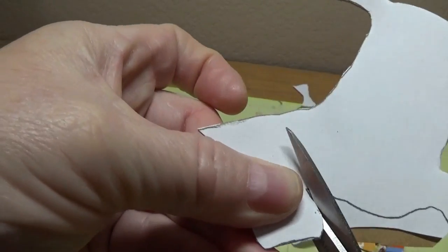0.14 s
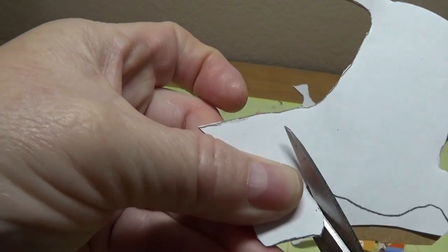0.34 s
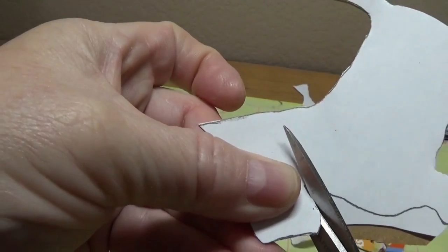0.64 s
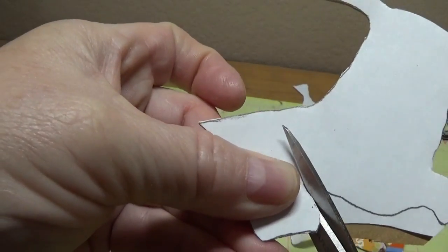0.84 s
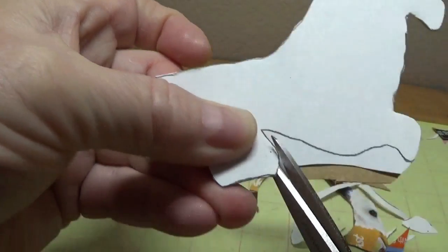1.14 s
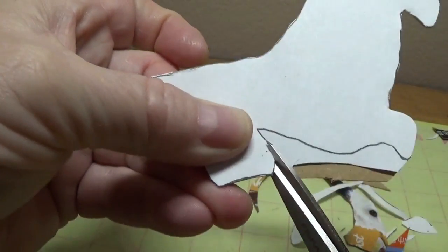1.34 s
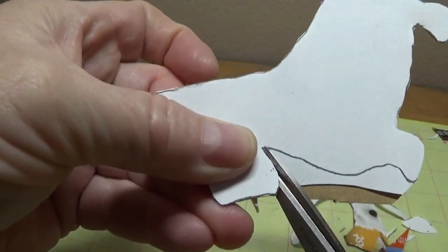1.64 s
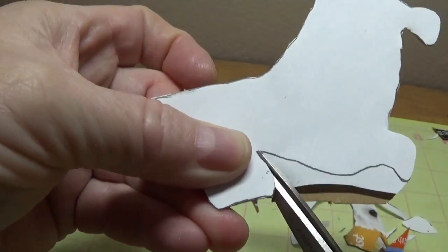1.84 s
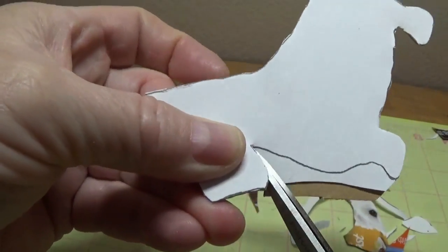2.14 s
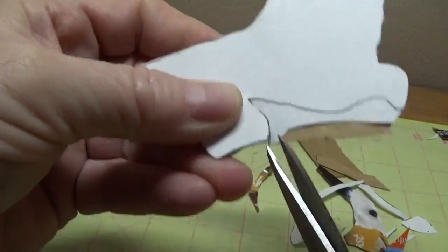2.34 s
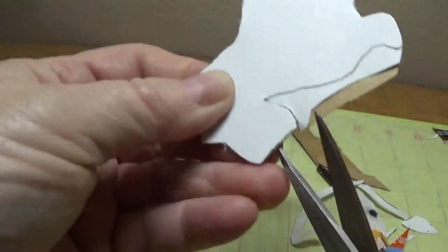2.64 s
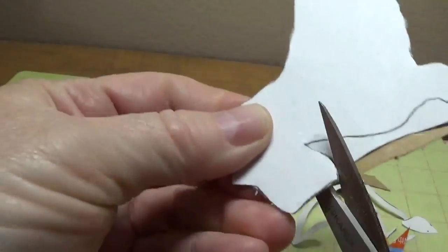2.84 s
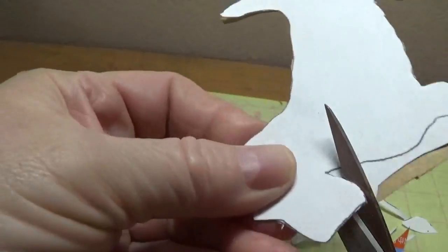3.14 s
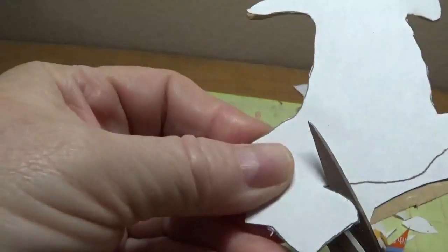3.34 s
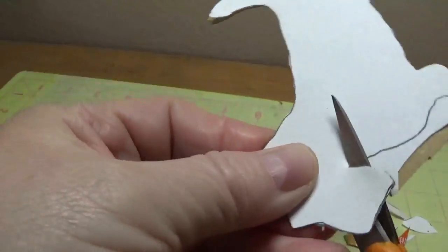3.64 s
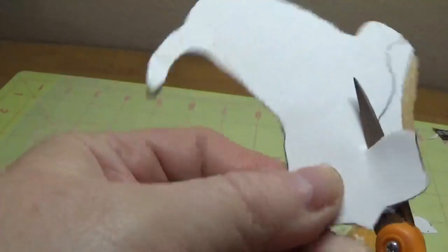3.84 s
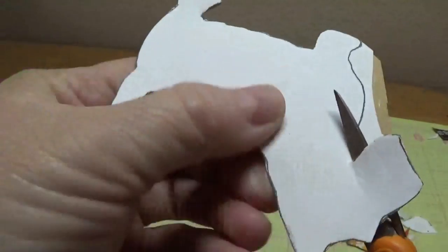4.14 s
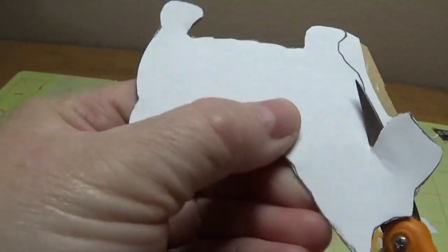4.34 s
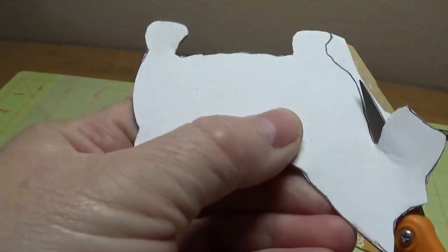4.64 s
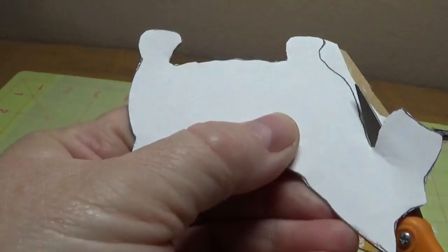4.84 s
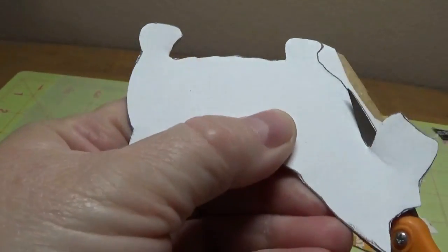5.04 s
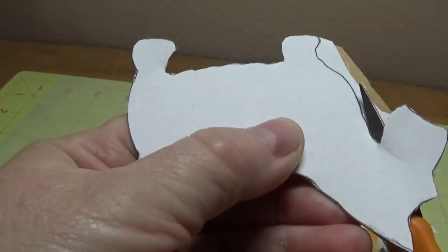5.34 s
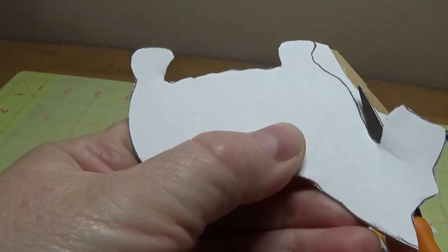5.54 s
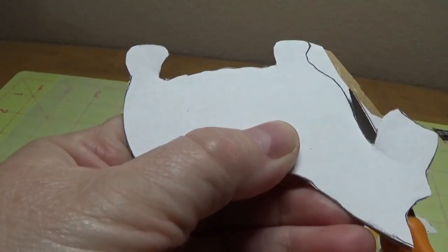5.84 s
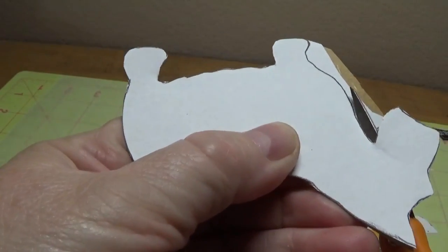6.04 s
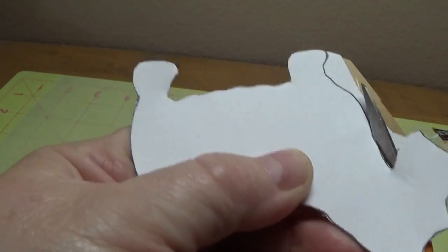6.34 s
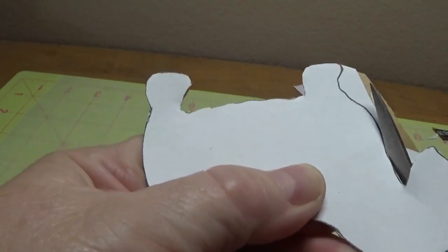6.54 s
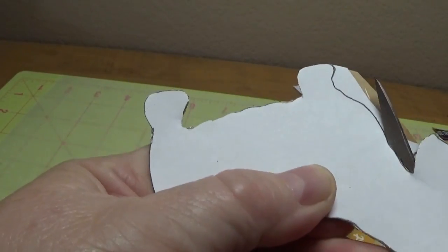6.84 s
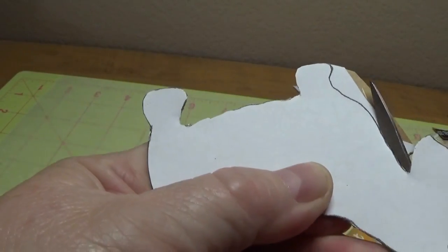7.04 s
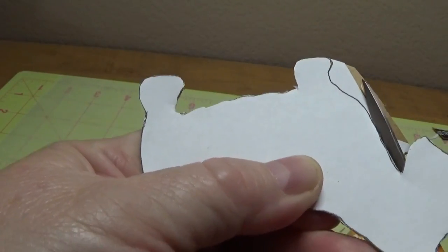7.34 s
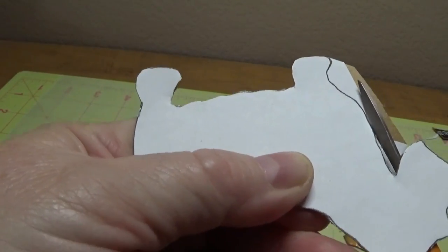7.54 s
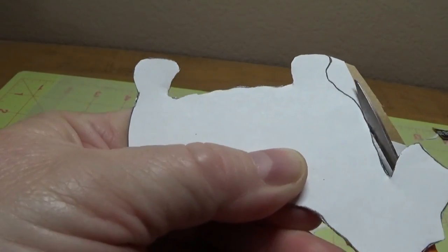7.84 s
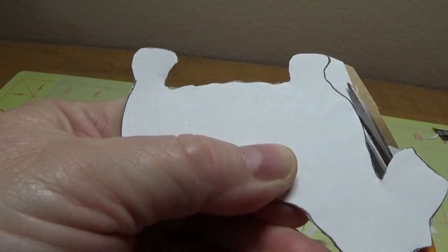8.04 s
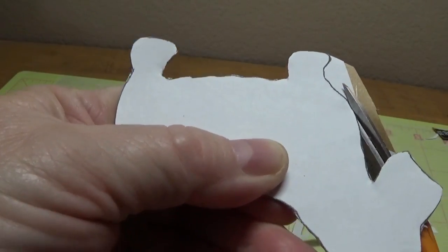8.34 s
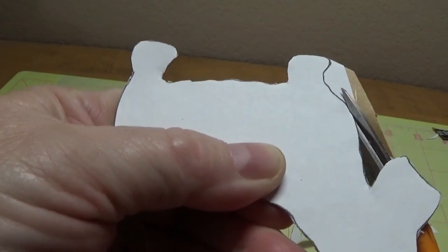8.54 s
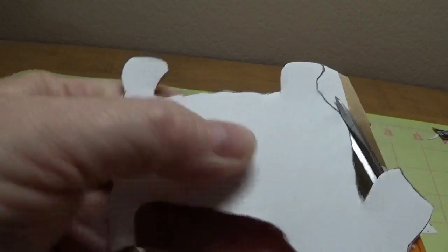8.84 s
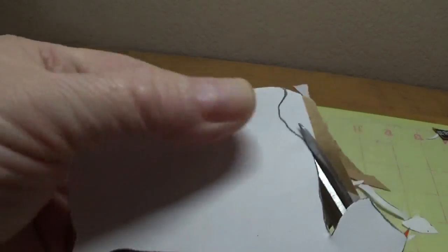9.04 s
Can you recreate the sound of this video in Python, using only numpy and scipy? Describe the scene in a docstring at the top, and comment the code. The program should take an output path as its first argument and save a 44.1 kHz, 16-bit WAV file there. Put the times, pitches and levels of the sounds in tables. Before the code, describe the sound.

Scissors snip irregularly through paper-covered cardboard close by, with dry rubbing, fine crackles and hollow snaps over a low steady hum.

```python
"""A craft table in a small room: scissors cut a shape out of paper-covered cardboard, heard from close by.
Blades and fingers rub on the sheet (grainy filtered noise) and fibres tick (tiny noise bursts).
Each snip ends in a snap: a brief tear that thuds and rings the card in a few fading tones.
An appliance hums (steady tones, resonant noise and air) and a camera whirrs faintly (rapid small ticks)."""
import sys
import numpy as np
from scipy import signal
from scipy.fft import rfft, irfft, next_fast_len
from scipy.io import wavfile
from scipy.ndimage import map_coordinates

SR = 44100
rng = np.random.default_rng(int(sys.argv[2]) if len(sys.argv) > 2 else 0)


def put_to_file(sound):
    """Save the sound as 16-bit audio at rate SR, in the file named by the first command-line argument."""
    columns = np.atleast_2d(sound).T  # one column per channel
    safe = np.clip(columns, -1, 1)
    whole_steps = np.round(safe * 32767)
    wavfile.write(sys.argv[1], SR, whole_steps.astype(np.int16))


N = 405719

# Levels of the card's sounds are those before the microphones and the room.
# The card gives way: t/s, tear length/s, thud level/dB, low ring f/Hz, level/dB, high ring f/Hz, level/dB,
# crack level/dB, fizz level/dB, raggedness/0-1; the thud is lowered further, levels are rms over 10 ms
SNAPS = [(0.642, 0.0054, -45, 990, -39.5, 2090, -42, -32, -37.5, 0.1),
         (2.021, 0.0021, -36, 800, -33.5, 1940, -43, -30, -26, 0.08),
         (2.873, 0.0011, -47, 660, -41.5, 1170, -47, -46, -54, 0.26),
         (2.9028, 0.0011, -50, 734, -38.5, 1380, -40.5, -45.5, -42.5, 0.23),
         (3.52, 0.00062, -54, 700, -43, 1190, -55, -43.5, -49.5, 0.26),
         (4.94, 0.0046, -35.5, 988, -21, 1860, -24.5, -28, -28.5, 0.62),
         (5.7702, 0.0028, -36.5, 940, -24, 2370, -29.5, -30.5, -29.5, 0.53),
         (6.0527, 0.0054, -39.5, 1170, -24, 1590, -51, -32, -30.5, 0.28),
         (6.9363, 0.0051, -53, 1160, -43, 1520, -51, -39, -40.5, 0.7),
         (6.9918, 0.0041, -32.5, 780, -32.5, 1380, -29, -27.5, -31, 0.17),
         (7.2046, 0.0045, -41.5, 846, -37, 1540, -31, -31, -32.5, 0.6),
         (7.2353, 0.0025, -43.5, 1170, -31.5, 1480, -27, -30.5, -30.5, 0.99),
         (7.6537, 0.0013, -48.5, 890, -50, 1375, -49, -37, -39.5, 0.6),
         (7.859, 0.0036, -38, 990, -27.5, 1540, -21.5, -29, -30.0, 0.04),
         (8.141, 0.0018, -46, 1180, -38.5, 2160, -46, -33, -31, 0.43),
         (8.823, 0.0058, -45.5, 910, -58, 2240, -39, -40.5, -30.5, 0.02)]
# Blades or fingers slide over the card: t/s when fastest, rise/s, fall/s,
# sheet level/dB, rasp level/dB, fizz level/dB
STROKES = [(0.01, 0.068, 0.1, -56, -54, -52), (0.943, 0.0051, 0.069, -56, -52, -47),
           (0.995, 0.065, 0.15, -48.5, -41, -40.5), (1.095, 0.072, 0.14, -52.5, -50, -61),
           (1.38, 0.04, 0.055, -57.5, -56.5, -61.5), (1.51, 0.06, 0.1, -64, -58, -59.5),
           (1.835, 0.05, 0.036, -60, -56.5, -52.5), (2.025, 0.007, 0.089, -39.5, -40.5, -36.5),
           (2.252, 0.049, 0.15, -51, -48.5, -49.5), (2.47, 0.22, 0.066, -79, -56.5, -45),
           (2.707, 0.053, 0.052, -54, -54, -49.5), (2.819, 0.034, 0.2, -57, -55.5, -52),
           (3.12, 0.12, 0.19, -54, -49, -48.5), (3.248, 0.016, 0.04, -49, -48, -49.5),
           (3.375, 0.074, 0.068, -55, -46, -44), (3.804, 0.071, 0.13, -54, -50, -40.5),
           (3.97, 0.062, 0.2, -52, -47, -46), (4.08, 0.032, 0.095, -53.5, -63, -48.5),
           (4.27, 0.044, 0.28, -57.5, -57, -53), (5.125, 0.06, 0.07, -52, -54.5, -49),
           (5.205, 0.023, 0.039, -55.5, -60, -48.5), (6.21, 0.048, 0.1, -56, -51.5, -48.5),
           (6.338, 0.093, 0.059, -42.5, -40.5, -39.5), (6.46, 0.12, 0.11, -54, -55.5, -53.5),
           (6.609, 0.032, 0.053, -67, -55, -49), (6.695, 0.1, 0.073, -40, -44, -46.5),
           (6.80, 0.022, 0.12, -54.5, -53, -49.5), (7.877, 0.024, 0.05, -45, -42, -43),
           (8.005, 0.021, 0.057, -56, -49, -52.5), (8.427, 0.022, 0.017, -55, -54, -49.5),
           (8.787, 0.041, 0.059, -56, -46, -41.5), (8.82, 0.012, 0.022, -48, -37, -33),
           (9.097, 0.019, 0.028, -48, -46.5, -44)]
# Blades creep through the card: start t/s, length/s, crackle level/dB, treble tilt/dB, brittleness/0-1
CUTS = [(3.528, 0.38, -61, 5.5, 0.6), (4.169, 0.4, -62.5, 4.5, .9), (4.564, .36, -67, 4, 0.85),
        (5.195, 1, -66.5, 4, 0.48), (7.382, 0.19, -61, 5, 0.14), (7.657, 0.14, -61.5, 4, 0),
        (8.09, 0.075, -58.5, 3, 0.06), (8.257, 0.21, -65, 5, 0.47), (8.54, 0.18, -66.5, 7, 0)]
# Single fibres break or catch: t/s, level/dB (rms over 10 ms), treble tilt/dB
TICKS = [(1.2085, -59, 2.5), (1.6685, -51, 7), (1.7747, -58.5, -4), (2.193, -58, 4), (2.3063, -45.5, 6),
         (2.314, -47.5, -2.5), (2.6451, -52.5, -3), (3.625, -60, 11.5), (3.769, -68.5, 26.5),
         (3.7917, -63, 19), (3.8998, -59, 8.5), (3.93, -51.5, 6), (4.107, -51.5, -3.5), (4.1193, -45.5, 1),
         (4.173, -62, 9), (4.2038, -68, 20), (4.22, -61, 13), (4.241, -61, 11), (4.25, -56.5, 18.5),
         (4.257, -60, 21.5), (4.298, -65, 20.5), (4.375, -70.5, 21), (4.4394, -64.5, 16), (4.523, -61, 17),
         (4.54, -62, 11), (4.612, -57.5, 16), (4.682, -71, 21), (4.69, -63, 21.5), (4.755, -62, 16),
         (4.8402, -65, 19), (4.9, -67, 18.5), (6.2813, -55.5, 16.5), (6.603, -52.5, 15), (6.614, -54.5, 15),
         (6.718, -49, 6), (6.8, -50, 1), (7.466, -63, 6), (7.77, -63, 4), (7.997, -47, 1),
         (8.019, -51.5, 5), (8.103, -54, 7), (8.335, -61, 3), (8.593, -55.5, 3.5), (8.65, -58.5, 10.5),
         (8.668, -59.5, 7), (8.7613, -61, 11.5), (8.768, -53.5, -3.5), (8.816, -40, 10), (8.828, -57, 5),
         (9.0785, -56.5, 9), (9.092, -52.5, 9.5)]
# The sheet springs back or a finger shifts its hold: t/s, f/Hz, level/dB (rms over 10 ms)
NUDGES = [(2.028, 555, -38), (2.515, 950, -48.5), (5.38, 1080, -52), (5.495, 1080, -50)]
# Tone of the flexing sheet: f/Hz, level/dB
SHEET_VOICE = [(250, -56), (560, -5.5), (790, 1.5), (2150, 0.5), (2700, -13.5), (5000, -38)]
# Tone of the rasping card: f/Hz, level/dB
RASP_VOICE = [(1200, -41), (2000, -19), (2600, 1), (3400, 3), (4300, -1), (5400, -0.5), (7000, -4.5),
              (9500, -45.5)]
# Tone of the finest fibres: f/Hz, level/dB
FIZZ_VOICE = [(3500, -14.5), (5800, -6), (6900, -2.5), (8000, 4.5), (9600, 5), (10700, 0.5), (12000, -26)]
# Resonance of the held sheet under rubbing, moving as the grip changes: t/s, f/Hz
GRIP_PATH = [(2.1, 4240), (2.7, 3470), (4.1, 3270), (6.33, 2930), (6.66, 1850), (8.0, 4530), (8.75, 2700)]
# Ringing of the steel blades: f/Hz, starting level/dB, time to fade by 60 dB/s
STEEL_MODES = [(992, -51.5, 0.66), (1560, -56, 0.87)]
# Balance of the card's sound: f/Hz, left minus right level/dB
CARD_BALANCE = [(300, 1), (1000, -0.7), (4800, -3), (7800, -2), (11000, -1)]
# How alike left and right hear the card: f/Hz, likeness/0-1
CARD_LIKENESS = [(1500, 1), (5000, 0.79), (11000, 0.94)]
# Echoes from table and walls: delay t/s, level/dB
ECHO_PATHS = [(0.0098, -9), (0.026, -17)]
# Fading of the room: f/Hz, time to fade by 60 dB/s
ROOM_FADE = [(200, 0.37), (1000, 0.24), (3000, 0.16), (10000, 0.15)]
# Tones of the appliance: f/Hz, level/dB (rms)
HUM_TONES = [(59, -64), (122.2, -60.5), (124.3, -67.5), (126.3, -63)]
# Room resonances that the appliance stirs: f/Hz, width/Hz, level/dB (rms, before it wavers)
DRONE_MODES = [(123.5, 14.5, -60.5), (226, 20, -62), (312.6, 9.6, -62), (404.7, 26, -67)]
# Tone of room air and microphone hiss: f/Hz, relative level/dB per Hz
AIR_TONE = [(20, -14), (40, -4), (55, -0.5), (75, -5.5), (110, 2), (180, -0.5), (480, -2.5), (700, -11),
            (1000, -11), (5000, -21.5), (11000, -25.5)]
# How alike left and right hear the air and the room: f/Hz, likeness/0-1
AIR_LIKENESS = [(140, 0.98), (480, 0.85), (1350, 0.073), (3820, 0.33), (10800, 0.83)]
# Resonances of the camera housing: f/Hz, relative level/dB
HOUSING_MODES = [(2850, -2), (3420, -8.5)]

VOICES = (SHEET_VOICE, RASP_VOICE, FIZZ_VOICE)
OVERTONE_RATIO, OVERTONE_DB = 1.323, -6  # a third mode, relative to the high ring
FLEX_WIDTH_HZ = 1300  # bandwidth of the noisy flexing
FLEX_ROUGH = 1.77  # phase roughness of the sheet's modes in a wholly ragged snap
FIRST_BREAK_DB, LAST_BREAK_AT = 0.5, 0.55  # top ply parts first, bottom one at this share of the tear length
FLEX_BREAK_SHARE, CRACK_BREAK_SHARE = 0.43, 0.29  # power share of those two breaks, 0-1
RISE_CURVE, FALL_CURVE = 1.55, 1.07  # fade shape of a stroke: 1 = straight in dB, 2 = rounded
BITE_S = 0.022  # time for the blades to take hold and to let go
STROKE_GRAIN, CUT_GRAIN = 0.39, 0.91  # share of the friction that is crackle, 0-1
CUT_SHEET_DB = 3  # extra flexing of the sheet during a slow cut
GRIP_DB, GRIP_OCTAVES = 3.5, 0.59  # height and half-width of the grip resonance
RINGING_SNIP_S = 7.86
TOP_HZ = 11200


def amp(db):
    """Turn decibels into gain."""
    return 10 ** (np.asarray(db) / 20)


def unit(x):
    """Scale to rms 1."""
    return x / np.sqrt(np.mean(x ** 2) + 1e-20)


def burst(x, db):
    """Scale a short sound so that its energy equals db rms over 10 ms."""
    return amp(db) * x / np.linalg.norm(x) * np.sqrt(SR / 100)


def add(track, s, x):
    """Mix x into the track at time s."""
    start = round(s * SR)
    track[start:start + len(x)] += x[:N - start]


def along(points, hz):
    """Read (Hz, value) points on a logarithmic pitch axis."""
    f, value = np.transpose(points)
    return np.interp(np.log(hz + 1), np.log(f + 1), value)


def wobble(rate):
    """Draw a smooth random curve with rate knots a second."""
    knots = rng.standard_normal(int(N * rate / SR) + 4)
    return map_coordinates(knots, [np.arange(N) * rate / SR])


def filtered(x, response):
    """Multiply the spectrum of x by a response of frequency."""
    n = x.shape[-1]
    size = 2 * next_fast_len(n // 2 + 2048, real=True)
    spectrum = rfft(x, size) * response(np.fft.rfftfreq(size, 1 / SR))
    return irfft(spectrum, size)[..., :n]


def coloured(x, tone):
    """Give x the tone of (Hz, dB) points, with no sound before its cause."""
    def response(hz):
        # folding the cepstrum forward in time makes the filter causal
        cepstrum = irfft(np.log(amp(along(tone, hz))))
        half = len(cepstrum) // 2
        cepstrum[1:half] *= 2
        cepstrum[half + 1:] = 0
        return np.exp(rfft(cepstrum))
    return filtered(x, response)


def resonance(f, hz, width):
    """Frequency response of one damped mode at hz."""
    return 1j * f * width / (hz * hz - f * f + 1j * f * width)


def ring(t, hz, t60, attack, rough):
    """A damped mode swells while it is fed, then fades; roughness unsettles its phase."""
    u = np.maximum(t, 0)
    drift = rough * np.cumsum(rng.standard_normal(len(t))) / np.sqrt(SR * t60)
    swell = 1 - np.exp(-u / attack)
    return np.sin(2 * np.pi * hz * u + drift) * amp(-60 * u / t60) * swell


def spread(a, b, likeness):
    """Blend two unrelated signals into a stereo pair of given likeness."""
    def turn(hz):
        return np.arccos(np.clip(along(likeness, hz), -1, 1)) / 2
    mid = filtered(a, lambda hz: np.cos(turn(hz)))
    side = filtered(b, lambda hz: np.sin(turn(hz)))
    return np.array([mid + side, mid - side])


def snaps():
    """Each snap tears, thuds in the hand and rings the sheet: cleanly in separate modes, raggedly as noise."""
    out = np.zeros(N)
    t = np.arange(-SR // 100, SR // 10) / SR
    for s, length, thud_db, low_hz, low_db, high_hz, high_db, crack_db, fizz_db, ragged in SNAPS:
        def fibres(break_share):
            rush = unit(tear(t, length, lead_db=-9, lead_s=length / 2, after_db=-16, after_s=0.007))
            breaks = unit(plies(t, length))
            return np.sqrt(break_share) * breaks + np.sqrt(1 - break_share) * rush

        def mode(hz, swell, db):
            return burst(ring(t, hz, t60=0.016, attack=length * swell, rough=FLEX_ROUGH * ragged), db)

        thud = burst(ring(t, hz=413, t60=0.018, attack=0.0015, rough=2.0), thud_db - 1.5)
        hand = burst(ring(t, hz=172.0, t60=0.044, attack=0.0022, rough=3.05), thud_db - 4.5)
        # neighbouring modes swing in opposite directions
        modes = mode(low_hz, 0.29, low_db) - mode(high_hz, 0.63, high_db)
        modes += mode(high_hz * OVERTONE_RATIO, 0.13, high_db + OVERTONE_DB)
        # ragged flexing gathers around the stronger mode
        ring_powers = amp([low_db, high_db]) ** 2
        centre_hz = np.average([low_hz, high_hz], weights=ring_powers)
        flex = filtered(coloured(fibres(FLEX_BREAK_SHARE), SHEET_VOICE),
                        lambda hz: resonance(hz, centre_hz, FLEX_WIDTH_HZ) ** 2)
        # the modes and the noisy flexing share the energy of the blow
        body = np.sqrt(1 - ragged) * unit(modes) + np.sqrt(ragged) * unit(flex)
        body = burst(body, 10 * np.log10(ring_powers.sum()))
        crack = burst(coloured(fibres(CRACK_BREAK_SHARE), RASP_VOICE), crack_db)
        fizz = burst(coloured(fibres(CRACK_BREAK_SHARE), FIZZ_VOICE), fizz_db)
        add(out, s + t[0], thud + hand + body + crack + fizz)
    return out


def tear(t, length, lead_db, lead_s, after_db, after_s):
    """A short noise swell, a rush, then a fading tail."""
    swell = amp(lead_db) * np.exp(np.minimum(t, 0) / lead_s) * (t < 0)
    main_break = np.exp(-(t / length) ** 2)
    tail = amp(after_db) * np.exp(-np.abs(t) / after_s)
    rush = (t >= 0) * (main_break + tail)
    return (swell + rush) * rng.standard_normal(len(t))


def plies(t, length):
    """The top and bottom plies part in two sharp breaks, each a single pulse."""
    force = np.zeros(len(t))
    force[np.searchsorted(t, [0, length * LAST_BREAK_AT])] = amp(FIRST_BREAK_DB), 1
    return force


def rubbing():
    """Sliding swishes with fine grain; biting blades tear soft card in spurts and crack brittle card."""
    fine = crackle(rate=920, scatter_db=4.5) ** 2
    brittle = crackle(rate=260, scatter_db=6.5) ** 2
    spurts = slips(rate=58, life=0.008) * fine
    pressure = amp(1.1 * wobble(50))

    def scrape(voice, sliding, tearing, cracking):
        power = sliding + tearing + cracking
        smooth = sliding * (1 - STROKE_GRAIN) + (tearing + cracking) * (1 - CUT_GRAIN)
        grainy = sliding * STROKE_GRAIN * fine + CUT_GRAIN * (tearing * spurts + cracking * brittle)
        grain = (smooth + grainy + 1e-20) / (power + 1e-20)
        friction = pressure * np.sqrt(grain) * rng.standard_normal(N)
        return np.sqrt(power) * unit(coloured(shifting(friction, patchy_db=4.5), voice))

    return sum(map(scrape, VOICES, stroke_power(), *cut_power()))


def stroke_power():
    """Each stroke speeds up and dies away: power in the sheet, rasp and fizz voices."""
    t = np.arange(N) / SR
    power = np.zeros((3, N))
    for s, rise, fall, *voices_db in STROKES:
        near = (t > s - 2 * rise) & (t < s + 2 * fall)
        u = t[near] - s
        away = np.where(u < 0, np.abs(u / rise) ** RISE_CURVE, np.abs(u / fall) ** FALL_CURVE)
        # 20 dB down after the rise or fall time
        power[:, near] += np.outer(amp(voices_db), amp(-20 * away)) ** 2
    return power


def cut_power():
    """Each slow cut takes hold, stays level and lets go: tearing and cracking power in the three voices."""
    t = np.arange(N) / SR
    power = np.zeros((2, 3, N))
    for s, length, db, tilt_db, brittle in CUTS:
        near = (t > s - BITE_S) & (t < s + length + BITE_S)
        edge_s = np.minimum(t[near] - s, s + length - t[near])
        hold = np.clip(edge_s / BITE_S + 0.5, 0, 1)
        voices_db = [db + CUT_SHEET_DB - tilt_db, db, db + tilt_db]
        voices = np.outer(amp(voices_db) ** 2, hold)
        power[:, :, near] += np.multiply.outer([1 - brittle, brittle], voices)
    return power


def crackle(rate, scatter_db):
    """Many tiny fibres break at random times, each a fading pulse of force; mean power 1."""
    strength = amp(scatter_db * np.minimum(rng.exponential(size=N), 3)) ** 2
    breaks = (rng.random(N) < rate / SR) * strength
    life_s = 0.00015
    power = signal.lfilter([1], [1, -np.exp(-1 / (SR * life_s))], breaks)
    return unit(np.sqrt(power))


def slips(rate, life):
    """The blades stick and slip at an uneven pace, each slip a short spurt of power; mean 1."""
    gaps = rng.uniform(0.3, 1.7, int(2 * rate * N / SR))
    times = np.cumsum(gaps) / rate
    starts = (times[times < N / SR] * SR).astype(int)
    spurts = np.bincount(starts, amp(rng.normal(0, 5, len(starts))), N)
    power = np.abs(signal.fftconvolve(spurts, signal.windows.hann(int(life * SR) + 3), 'same'))
    return power / power.mean()


def shifting(x, patchy_db):
    """The held sheet's resonance moves with the grip, and smaller peaks and dips drift around it."""
    hz, t, z = signal.stft(x, SR, nperseg=512)
    # random patches, 6 frequency bins by 22 frames between knots
    knots = rng.standard_normal((z.shape[0] // 6 + 3, z.shape[1] // 22 + 3))
    field = map_coordinates(knots, np.indices(z.shape) / np.array([6, 22])[:, None, None], order=2)
    octaves = np.log2((hz[:, None] + 1) / np.interp(t, *np.transpose(GRIP_PATH)))
    peak_db = GRIP_DB * np.exp(-(octaves / GRIP_OCTAVES) ** 2)
    return signal.istft(z * amp(peak_db + patchy_db * np.tanh(field)), nperseg=512)[1][:N]


def ticks():
    """Single fibres break between the blades; thin ones are bright, thick ones flex the sheet."""
    out = np.zeros(N)
    t = np.arange(-SR // 100, SR // 20) / SR
    for s, db, tilt_db in TICKS:
        length = 0.00079 * amp(-tilt_db / 2)  # thick fibres take longer to part
        for lean, voice in zip((-1, 0, 1), VOICES):
            fibre = tear(t, length, lead_db=-20, lead_s=0.0012, after_db=-16, after_s=0.0025)
            add(out, s + t[0], burst(coloured(fibre, voice), db + lean * tilt_db))
    return out


def nudges():
    """A nudge makes the card drum softly: a low mode of the sheet murmurs with a rough phase."""
    out = np.zeros(N)
    t = np.arange(SR // 5) / SR
    for s, hz, db in NUDGES:
        add(out, s, burst(ring(t, hz, t60=0.13, attack=0.008, rough=9), db))
    return out


def blade(s):
    """One clean, hard snip leaves the steel faintly ringing in slowly fading tones."""
    out = np.zeros(N)
    t = np.arange(SR) / SR
    for hz, db, t60 in STEEL_MODES:
        add(out, s, amp(db - 60 * t / t60) * np.sin(2 * np.pi * hz * t))
    return out


def at_microphones(x):
    """The card sits a little to the right; hand and sheet scatter its highs differently to each side."""
    t = np.arange(SR // 200)
    scatter = rng.standard_normal(len(t)) * (t > SR // 1000)  # from 1 to 5 ms late
    scattered = signal.fftconvolve(x, scatter / np.linalg.norm(scatter))[:N]
    pair = spread(x, scattered, CARD_LIKENESS)
    return filtered(pair, lambda hz: amp(np.outer([0.5, -0.5], along(CARD_BALANCE, hz))))


def room(x, wet_db, echo_hz, echo_width_hz):
    """Table and walls return a few hollow echoes and a short tail of fading noise."""
    walls = np.zeros(SR // 10)
    for delay, db in ECHO_PATHS:
        walls[round(delay * SR)] += amp(db)
    echoes = signal.fftconvolve(x, walls)[:N]
    early = filtered(echoes, lambda hz: resonance(hz, echo_hz, echo_width_hz))
    # each pitch of the tail fades at its own pace
    hz, t, z = signal.stft(rng.standard_normal((2, SR // 2)), SR, nperseg=256)
    fade = amp(-60 * t / along(ROOM_FADE, hz)[:, None])
    tail = signal.istft(z * fade, SR, nperseg=256)[1]
    tail *= 1 - np.exp(-np.arange(tail.shape[1]) / (SR * 0.00093))
    late = signal.fftconvolve(x[None], tail / np.linalg.norm(tail[0]), axes=1)[:, :N]
    return early + amp(wet_db) * spread(*late, AIR_LIKENESS)


def hum():
    """Close motor tones beat against each other over droning room resonances and air noise."""
    t = np.arange(N) / SR
    tones, drone = np.zeros(N), np.zeros(N)
    for hz, db in HUM_TONES:
        phase = 2 * np.pi * (hz * t + rng.random()) + 0.3 * wobble(3)
        tones += amp(db) * unit(amp(1.5 * wobble(5)) * np.sin(phase))
    for hz, width, db in DRONE_MODES:
        # two passes narrow the band, so each pass is wider
        mode = filtered(rng.standard_normal(N), lambda f: resonance(f, hz, width * np.sqrt(2)) ** 2)
        drone += amp(db) * unit(mode)
    air = unit(spread(*coloured(rng.standard_normal((2, N)), AIR_TONE), AIR_LIKENESS))
    return tones + amp(wobble(4.7)) * drone + amp(-54.5) * air


def whirr(level_db, length, rebound_s, rebound_db, jitter_s):
    """The camera's mechanism ticks about thirty times a second; a softer, looser rebound follows each tick."""
    period = 1 / 29.97
    t = np.arange(SR // 20) / SR
    out = np.zeros(N)
    for beat in np.arange(0.0133, N / SR - period, period):
        s = beat + rng.uniform(-jitter_s, jitter_s)
        strength = amp(2 * rng.standard_normal())
        tick = sum(amp(db) * unit(ring(t, hz, t60=length, attack=length / 20, rough=2.6))
                   for hz, db in HOUSING_MODES)
        add(out, s, strength * tick)
        rebound = unit(ring(t, HOUSING_MODES[0][0], t60=2 * length, attack=length / 10, rough=4.5))
        rebound_gain = strength * amp(rebound_db + 2 * rng.standard_normal())
        add(out, s + rebound_s + rng.uniform(-jitter_s, jitter_s), rebound_gain * rebound)
    return amp(level_db) * unit(out)


def scene():
    """Mix the cutting close by, its room, and the steady background."""
    card = snaps() + rubbing() + ticks() + nudges() + blade(RINGING_SNIP_S)
    direct = at_microphones(card)
    reflected = room(card, wet_db=-13.5, echo_hz=1084, echo_width_hz=190)
    camera = whirr(level_db=-67.0, length=0.022, rebound_s=0.0058, rebound_db=-3, jitter_s=0.0006)
    camera = camera * amp([[1], [-1]])  # 2 dB louder on the left
    return direct + reflected + hum() + camera


def record(dry):
    """The camera keeps almost nothing above its band limit: a very steep treble cut."""
    return filtered(dry, lambda hz: 1 / np.sqrt(1 + (hz / TOP_HZ) ** 300))


dry = scene()
out = record(dry)
put_to_file(out)
```